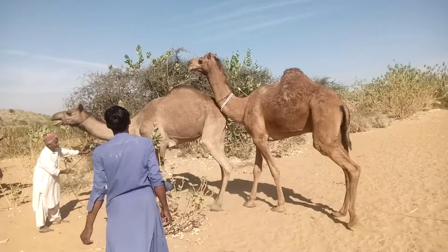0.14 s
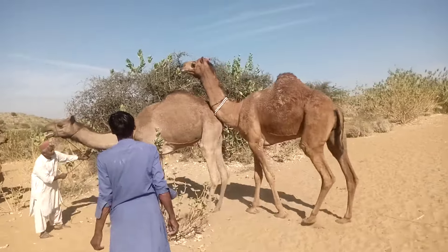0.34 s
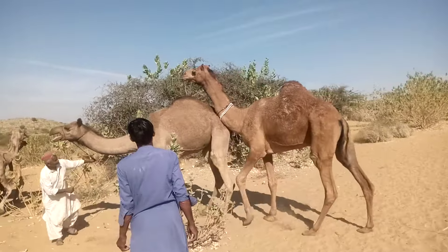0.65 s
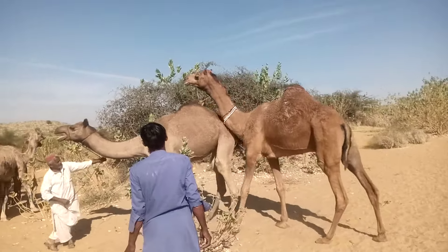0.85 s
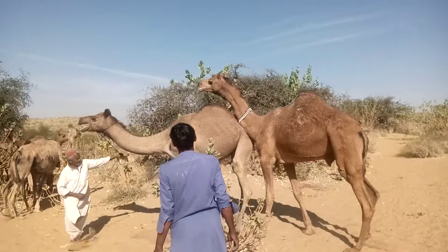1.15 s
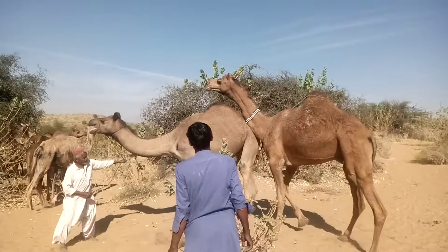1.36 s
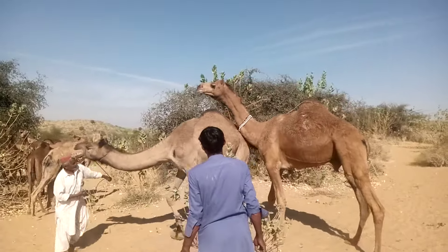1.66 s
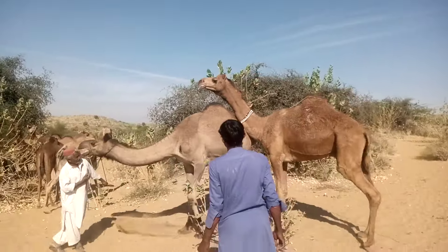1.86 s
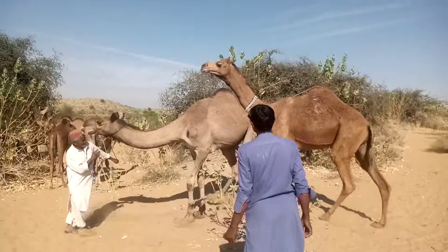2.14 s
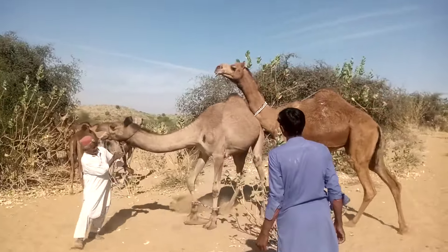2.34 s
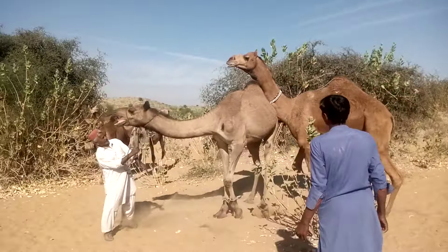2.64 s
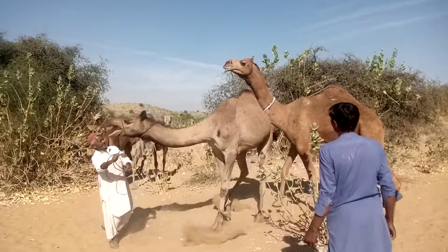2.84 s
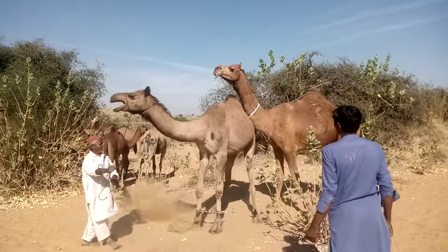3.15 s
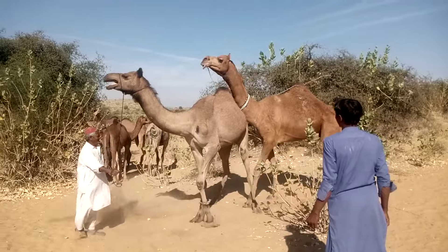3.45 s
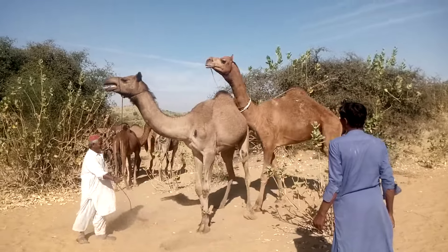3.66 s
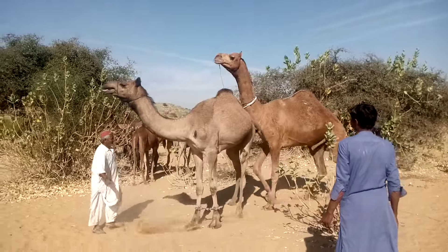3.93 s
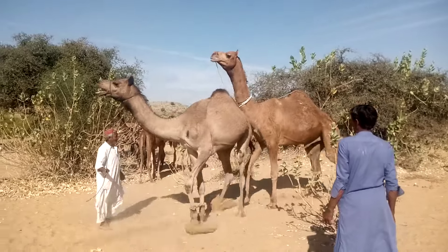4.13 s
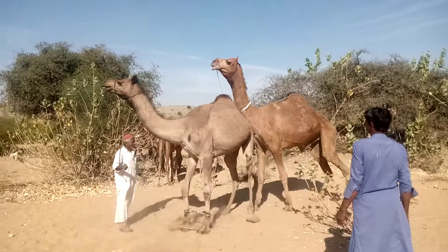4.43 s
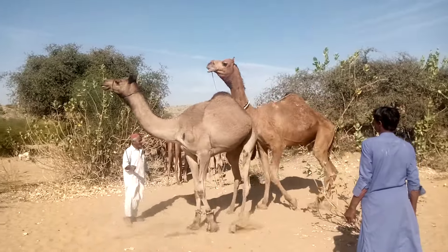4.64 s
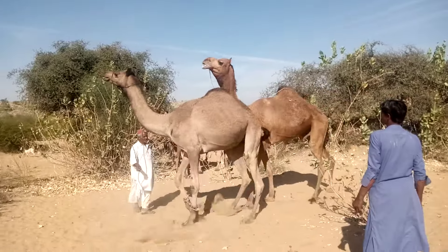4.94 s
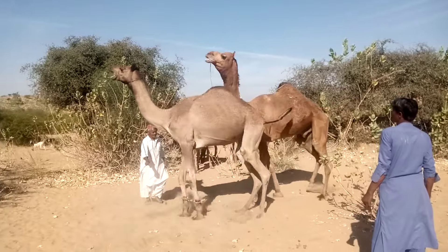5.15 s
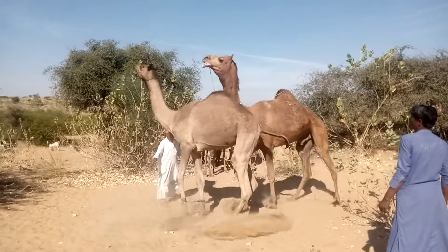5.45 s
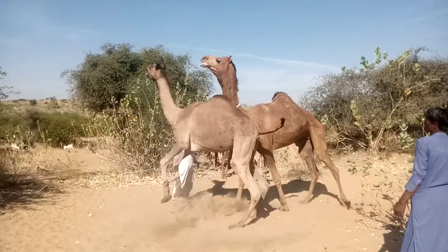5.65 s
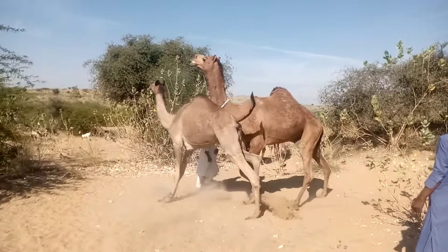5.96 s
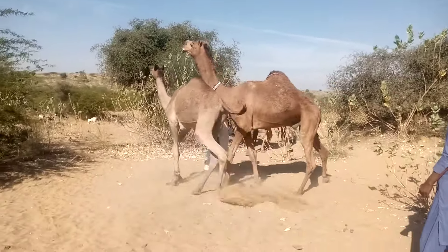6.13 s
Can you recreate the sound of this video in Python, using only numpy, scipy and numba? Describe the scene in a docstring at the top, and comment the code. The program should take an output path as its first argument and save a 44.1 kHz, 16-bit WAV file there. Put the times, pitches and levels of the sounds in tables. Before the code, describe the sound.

A camel bellows three times on open sand, a few metres from a phone microphone. Its calls shift between brief clear notes and a rough, fluttering growl. The first is the longest; after the second come two soft, low groans and a faint rasp, then the last bellow. Underneath, feet thud and scuff in the sand, grit and dry twigs tick, and light wind rumbles on the microphone.

```python
"""On open sand, a camel bellows three times a few metres from a phone, with soft groans before the last.
Its vocal folds sing clear notes that break into a growl when a slack flap in the throat flutters and
chops them; the resonances of throat, mouth and nose filter the pulses. Wind rumbles on the microphone
port; feet thud and scuff the sand, grit and dry twigs tick."""
import sys
import numpy as np
from scipy import signal
from scipy.fft import rfft, irfft
from scipy.io import wavfile
from scipy.ndimage import uniform_filter1d
from numba import njit

SR = 44100
rng = np.random.default_rng(int(sys.argv[2]) if len(sys.argv) > 2 else 0)


def generate_wav(sig):
    """Save sig (samples, or channels by samples) to the path in sys.argv[1] as 16-bit PCM at SR."""
    pcm = np.round(np.clip(np.atleast_2d(sig).T, -1, 1) * 32767).astype(np.int16)
    wavfile.write(sys.argv[1], SR, pcm)


N = 277389
TIME = np.arange(N) / SR


def amp(db):
    """Decibels to amplitude ratio."""
    return 10 ** (np.asarray(db) / 20)


def unit(x):
    """Normalisation to rms 1."""
    return x / np.sqrt(np.mean(x ** 2))


def curves(rows):
    """Linear interpolation of each column over the times in the first."""
    times, *columns = np.transpose(rows)
    return [np.interp(TIME, times, column) for column in columns]


def gate_of(phrases, attack_s, release_s):
    """Trapezoidal envelope, open while any phrase runs."""
    ramps = (np.minimum((TIME - p[0][0]) / attack_s, (p[-1][0] - TIME) / release_s) for p in phrases)
    return np.minimum(sum(np.clip(ramp + 1, 0, 1) for ramp in ramps), 1)


@njit
def bandpass(x, hz, width):
    """Two-pole state-variable resonator with unity gain at its moving centre."""
    y, band, low = np.empty(len(x)), 0., 0.
    for i in range(len(x)):
        g, damping = np.tan(np.pi * hz[i] / SR), width[i] / hz[i]
        v = (band + g * (x[i] - low)) / (1 + g * (g + damping))
        band, low, y[i] = 2 * v - band, low + 2 * g * v, damping * v
    return y


def resonance(x, hz, width, order=2):
    """Resonators in cascade, each `width` Hz wide: every stage steepens the skirts."""
    for _ in range(order):
        x = bandpass(x, hz + np.zeros(N), width + np.zeros(N))
    return x


def noise_band(hz, width, order):
    """Band-limited Gaussian noise of rms 1."""
    return unit(resonance(rng.standard_normal(N), hz, width, order))


def wander(rate):
    """Random modulation of rms 1: `rate` steps a second, smoothed twice."""
    hold = int(SR / rate)
    steps = np.repeat(rng.standard_normal(N // hold + 1), hold)
    return unit(uniform_filter1d(uniform_filter1d(steps, hold), hold)[:N])


def colour(x, points):
    """Spectral shaping by (Hz, dB) points on a logarithmic frequency axis."""
    hz, db = np.transpose(points)
    bins_hz = np.arange(N // 2 + 1) * SR / N
    return irfft(rfft(x) * amp(np.interp(np.log(bins_hz + 1), np.log(hz), db)), N)


def ambience():
    """Noise floor: a faint, broad hush that wavers in level."""
    return amp(-79 + 2.2 * wander(12)) * noise_band(470, 1500, order=2)


# Each row: time in seconds, rumble level in dB.
WIND_LEVELS = [(0.0, -57.5), (.24, -57), (.3, -73), (.38, -54), (1.05, -46.5), (1.33, -46.5), (1.4, -68),
               (1.45, -53), (2.19, -41.5), (2.54, -42), (2.63, -53), (2.79, -42), (2.98, -60.5),
               (3.08, -52), (3.59, -55.5), (3.85, -73.5), (4.06, -46), (4.62, -55), (5.12, -55.5),
               (5.46, -56), (5.85, -82), (5.88, -55), (6.29, -59)]


def wind():
    """Turbulence: eddies buffet the microphone port with a low rumble and brief puffs above it."""
    db, = curves(WIND_LEVELS)
    eddies = rng.standard_normal(N)
    rumble = unit(resonance(eddies, 92, 150, order=3))
    puffs = amp(-28 + 9.5 * wander(23)) * unit(resonance(eddies, 180, 220, order=3))
    return amp(db + wander(22) + 1.1 * wander(6.5)) * (rumble + puffs)


# Shifting sand. Each row: time in seconds, top-octave hiss in dB, lower hiss in dB.
SAND_HISS = [(0.0, -74, -66), (.37, -69, -67), (.91, -75, -81), (1.47, -79.5, -71), (1.63, -70.5, -67.5),
             (1.91, -73, -69.5), (2.2, -75, -72.5), (2.56, -71, -67.5), (2.99, -71.5, -63),
             (3.22, -65, -78), (3.52, -73, -71.5), (3.9, -81, -62.5), (4.1, -76.5, -87.5),
             (4.3, -68, -66.5), (4.6, -73, -77), (4.79, -73, -71), (4.81, -70.5, -62.5),
             (5.25, -73.5, -67.5), (5.83, -70.5, -75), (6.01, -78, -68.5), (6.15, -65, -71),
             (6.29, -73, -93)]
# Spectrum of the hiss. Each row: frequency in Hz, relative spectral density in dB.
GRAIN_SPECTRUM = [(530, -42), (900, -18), (1000, -33), (1370, -15), (1620, -20), (1920, 5), (2710, 1),
                  (3750, 3.5), (5700, 0.5), (8270, -24), (11000, -20), (13700, -34.5), (15800, -23.5)]
# Dragged feet. Each row: start in seconds, length in seconds, level in dB, top octave relative to it in dB.
FOOT_SCUFFS = [(1.606, 0.012, -59, -13), (2.298, 0.029, -63, -10), (2.57, 0.0031, -44.5, -5.5),
               (3.78, 0.015, -58, -21), (3.874, 0.0071, -56.5, -20), (4.2, 0.032, -64.5, -24),
               (4.691, .03, -65.5, -8), (5.581, 0.017, -44, -7), (5.992, 0.049, -46.5, -6.5)]
# Grit and twigs. Each row: start in seconds, snap level in dB, top octave relative to it in dB.
TWIG_TICKS = [(0.4057, -47, -5), (0.6662, -61, 3), (0.754, -48, -48), (0.876, -47.5, -5),
              (0.9085, -47.5, -8), (0.999, -60.5, -1), (1.557, -54, -1), (1.584, -43, -7),
              (1.595, -38.5, -8), (2.5065, -65, 12), (3.119, -57, 7.5), (3.2293, -44.5, -26),
              (3.3138, -55, 4.5), (3.5686, -45.5, -3), (3.7257, -60, 6), (4.259, -56, -7),
              (4.381, -43, -7.5), (4.454, -43, -15), (4.6014, -68.5, 7), (4.987, -51.5, -1),
              (5.037, -49, -12), (5.3135, -46, -37), (5.5468, -56.5, -3), (5.893, -44.5, -10),
              (6.1772, -47.5, -10)]
SNAP_T60_S, TRICKLE_T60_S, TRICKLE_DB = 0.0066, 0.055, -4.5


def sand():
    """Granular friction and impact: grains hiss, feet scuff, and a trickle follows each snap."""
    top_db, lower_db = curves(SAND_HISS)
    grain_db = 2.1 * np.minimum(rng.exponential(size=N // 60 + 1), 4.5)
    grains = unit(amp(grain_db).repeat(60)[:N])
    top_gain = amp(top_db + 1.6 * wander(13)) * grains
    lower_gain = amp(lower_db + 4 * wander(18)) * grains
    crackle_gain = np.zeros(N)
    for start, length, db, bright_db in FOOT_SCUFFS:
        release = np.exp(-np.maximum(TIME - start - length, 0) / 0.011)
        drag = amp(db) * grains * np.clip((TIME - start) / 0.006, 0, 1) * release
        crackle_gain += drag
        top_gain += drag * amp(bright_db)
    for start, db, bright_db in TWIG_TICKS:
        age = np.maximum(TIME - start, 0)
        decay = amp(-60 * age / SNAP_T60_S) + amp(TRICKLE_DB - 60 * age / TRICKLE_T60_S)
        snap = amp(db) * np.minimum(age / 0.00023, 1) * decay
        crackle_gain += snap
        top_gain += snap * amp(bright_db)
    hiss = colour(rng.standard_normal(N), GRAIN_SPECTRUM)
    lower = signal.sosfilt(signal.butter(4, 7600, fs=SR, output="sos"), hiss)
    top = signal.sosfilt(signal.butter(4, 7600, "high", fs=SR, output="sos"), hiss)
    # each band of the lower hiss comes and goes on its own
    patches = sum(amp(2.5 * wander(12)) * resonance(lower, hz, hz / 2) for hz in 1000 * 1.4 ** np.arange(7))
    crackle = noise_band(4630, 3600, order=3)
    return lower_gain * unit(patches) + crackle_gain * crackle + top_gain * unit(top)


# Each row: time of the peak in seconds, peak level in dB, reach in Hz (twice the centre of the band).
FOOTFALLS = [(2.138, -48.5, 430), (2.251, -49.5, 504), (2.55, -46.5, 394), (4.03, -53, 454),
             (4.22, -45.5, 300.6), (4.85, -52.5, 706), (4.898, -52, 799), (5.09, -47.5, 902)]


def footfalls():
    """Damped impact: a padded foot on sand gives a short, dull burst of noise."""
    noise, out = rng.standard_normal(N), 0
    for peak_s, db, reach_hz in FOOTFALLS:
        thud = unit(resonance(noise, reach_hz / 2, 0.98 * reach_hz, order=4))
        out += amp(db) * thud * np.exp(-((TIME - peak_s) / 0.015) ** 2)
    return out


def harmonics(hz, levels_db, lag_rad=0.9):
    """Harmonic series from rms levels; a quadratic phase lag smears each pulse, as the throat does."""
    phase = 2 * np.pi * np.cumsum(hz) / SR
    return sum(np.sqrt(2) * amp(db) * np.cos((k + 1) * phase - lag_rad * k ** 2)
               for k, db in enumerate(levels_db))


# One list per groan. Each row: time in seconds, pitch in Hz, level of the strongest harmonic in dB,
# its number, slope to either side in dB per harmonic.
SOFT_GROANS = [
    [(3.7, 146, -62, 1, -20), (3.8, 143, -62, 1, -20), (3.92, 132, -68, 1, -20)],
    [(4.27, 57, -71, 6, -3), (4.35, 55, -67, 6, -3), (4.5, 49, -67, 7, -3), (4.62, 45, -73, 7, -3)],
]


def groans():
    """Phonation with the mouth shut: a soft hum with one spectral peak."""
    hz, db, strongest, slope_db = curves(np.concatenate(SOFT_GROANS))
    levels_db = [db + abs(k - strongest) * slope_db + 0.94 * wander(4.37) for k in range(1, 13)]
    return gate_of(SOFT_GROANS, 0.034, 0.034) * harmonics(hz, levels_db)


# Each row: start in seconds, length in seconds, tremble as a fraction of the pitch, then harmonics 1 to 7
# in dB relative to the call level, before bloom.
CLEAR_NOTES = [(0.165, 0.155, 0.0048, 3, -14.5, -11, -5, -10, -21, -24),
               (1.279, 0.11, .003, 0, -6, -18.5, -25, -13.5, -24.5, -26),
               (1.722, 0.065, .016, -7.5, -4.5, -15, -27, -25.5, -39, -36),
               (2.661, 0.092, .012, 2.5, -6, -5.5, -45, -22.5, -29, -33.5),
               (2.775, 0.14, 0.0048, 0.5, 0, -5, -15.5, -22, -39.5, -38.5)]
BLOOM, BLOOM_FROM_DB = 0.25, -19  # louder is brighter: dB per harmonic per dB of level, and its pivot


def clear_notes(hz, db):
    """Periodic vibration of the folds gives a harmonic tone; returns the tone and its gate."""
    spans = [[(start, *rest), (start + length, *rest)] for start, length, *rest in CLEAR_NOTES]
    tremble, *spectrum_db = curves(np.concatenate(spans))
    gate = gate_of(spans, attack_s=0.0089, release_s=0.057)
    pitch = hz * (1 + tremble * wander(60))
    tilt_db = BLOOM * (db - BLOOM_FROM_DB)
    levels_db = [level + k * tilt_db + (.5 + k) * wander(50) for k, level in enumerate(spectrum_db)]
    return gate * amp(db) * harmonics(pitch, levels_db), gate


@njit
def pulse_train(hz, speed, size):
    """Jitter and shimmer: each cycle has its own speed and size. Returns pulses and phase from 0 to 1."""
    pulses, phases, phase, cycle = np.zeros(len(hz) + 1), np.empty(len(hz)), 0., 0
    for i in range(len(hz)):
        step = hz[i] * speed[cycle] / SR
        phase += step
        if phase >= 1:
            phase, cycle = phase - 1, cycle + 1
            pulses[i] += size[cycle] * phase / step
            pulses[i + 1] += size[cycle] * (1 - phase / step)
        phases[i] = phase
    return pulses[:-1], phases


# Each row holds until the next: start in seconds, flutter rate in Hz, depth and unevenness from 0 to 1.
FLAP_FLUTTER = [(0, 33, 0.6, .17), (.15, 28, 0.9, .08), (.54, 32.5, .95, .015), (.82, 40, .9, .1),
                (1.09, 45, 0.92, .2), (1.7, 60, .8, .18), (2.63, 85, 0.55, .25), (3.28, 24, .9, .3),
                (4.79, 25, 0.8, 0.6), (5.27, 55, .92, .3), (5.58, 48, .95, .08), (5.78, 32, .97, 0.4)]
FOLD_JITTER, FOLD_SHIMMER_DB, SLIP_CYCLES = .06, 3, .4


def chopped_folds(hz, calm):
    """Amplitude modulation: the flap chokes the fold pulses and slaps. Returns low, high and nasal drive."""
    rows = np.array(FLAP_FLUTTER)
    rate, depth, uneven = rows[np.searchsorted(rows[1:, 0], TIME), 1:].T
    jitter, shimmer, flap_jitter, flap_shimmer = rng.standard_normal((N // 60, 4)).T
    flap_hz = rate * np.exp(uneven * wander(30))
    slaps, flap_phase = pulse_train(flap_hz, np.exp(.06 * flap_jitter), amp(3.5 * flap_shimmer))
    slip_hz = SR * np.minimum(SLIP_CYCLES * depth * slaps, .9)  # each slap jolts the folds' phase
    folds, _ = pulse_train(hz + slip_hz, np.exp(FOLD_JITTER * jitter), amp(FOLD_SHIMMER_DB * shimmer))
    opening = 1 - depth * np.cos(np.pi * flap_phase) ** 4
    breath = rng.standard_normal(N) * opening
    voiced = unit(folds * opening - np.mean(folds * opening))
    spurt = 1 + 5 * depth * (1 - calm) * np.exp(-flap_phase / 0.088)  # air escapes after each slap
    low = voiced + .35 * breath + 0.63 * unit(slaps)
    high = voiced + 3.1 * breath * spurt + unit(slaps)
    rattle = 1.6 * depth ** 4 * (1 - calm) * unit(slaps)  # full closure rattles the nose
    return low, high, high + rattle


def formant_cluster(drive, modes, shift=1):
    """Parallel resonances, each drifting in frequency and flickering in level; rms 1."""
    return unit(sum(amp(db + 3 * wander(14)) * resonance(drive, hz * shift * (1 + .025 * wander(7.3)), width)
                    for hz, width, db in modes))


def antiresonance(x, hz, width, depth):
    """A side branch absorbs one band of the spectrum."""
    return x - depth * resonance(x, hz, width, order=1)


# Rasp and, above it, air resonances. Each row: frequency in Hz, width in Hz, relative level in dB.
RASP_MODES = [(1910, 300, -8), (2300, 400, -10.5), (2880, 350, -12)]
AIR_MODES = [(3250, 400, 5.5), (4104, 450, 7), (4460, 220, 6)]
# Each row: time in seconds, mouth gain in dB before opening is added, nose resonance in Hz, nose gain
# in dB before strain is added, side-pocket dip in Hz, air relative to rasp in dB.
UPPER_TRACT = [(0, -0.5, 1410, -4, 2940, -6), (.24, 7, 1415, 11.5, 3160, 1.5),
               (.42, 0, 1470, -9, 3080, -1.5), (.72, -1.5, 1511, 2, 2810, -1.5),
               (1.05, -6, 1590, -14, 2710, -1), (1.18, -7.5, 1630, -4.5, 2752, 2),
               (1.4, -14, 1588, 0, 2680, 7.5), (1.62, -6, 1480, -5.5, 3130, -1),
               (1.94, -11, 1674, -5, 3025, -1), (2.64, -10.5, 1747, -9, 3740, -10),
               (2.79, 1, 1618, -10.5, 3610, -3.5), (2.92, -4, 1440, 6.5, 3510, 2),
               (3.1, -4, 1323, 5.5, 2938, -5), (3.27, -4, 1491, 2, 2880, -7),
               (3.55, -8.5, 1520, -12.5, 2810, -10.5), (3.76, 10.5, 1613, -5, 2850, -13),
               (4.8, -2, 1380, 3.5, 3136, 7), (5.26, -16, 1380, -5.5, 3030, 0),
               (5.3, -14, 1268, -3.5, 3070, -20), (5.5, -14.5, 1200, -11, 2780, -10.5),
               (5.68, -30, 1197, -12.5, 2735, -6), (5.74, -0.5, 1750, -17.5, 2710, -6),
               (6.0, -8, 1747, -18, 2845, -14), (6.29, -32, 1694, -10.5, 3170, -1)]
# Two resonances between palate and teeth. Each row: time in seconds, edge resonance in Hz, its level over
# the rasp in dB, top resonance in Hz, its level over the rasp in dB, side-pocket depth from 0 to 1.
PALATE_MODES = [(0, 5240, -4, 6200, 6, .9), (.17, 5400, -6.5, 6300, -29, 0), (.3, 5000, -2, 6200, -30, 0.8),
                (.45, 5150, -9, 6070, -5, 0.99), (.75, 4950, -7.5, 5950, -30, 0.45),
                (1.05, 5300, -10.5, 6130, -1.5, 0.98), (1.42, 5100, -11, 6100, -12.5, 0.85),
                (1.68, 5650, -11.5, 6400, -22.5, 0.99), (1.74, 5500, -11, 6335, -26, 0.02),
                (1.8, 4590, -18, 6360, -19, 0.05), (1.94, 4940, -9, 6040, -12, 0.6),
                (2.68, 5200, -13.5, 6178, -21, 0.71), (2.76, 4900, -16.5, 6180, -11.5, 0.54),
                (2.86, 5160, -2.5, 6320, -13.5, 0.72), (3.1, 5580, -15, 6490, -17, 0.97),
                (3.3, 4860, -16, 6160, -18.5, 0.86), (3.76, 5020, -17, 6070, -33.5, 1),
                (4.8, 5100, -7.5, 5880, -12, 0), (5.3, 4900, -17, 6170, -24, 0.18),
                (5.45, 4860, -21, 6090, -23, 0.3), (5.55, 4800, -12, 6040, -17, 0.9),
                (6.29, 4990, -18, 6000, -26, 0.58)]
# Dip of the nasal passage. Each row: time in seconds, frequency in Hz, depth from 0 to 1.
NASAL_NOTCH = [(1.9, 1301, 0.31), (3.2, 1314, 0.25), (3.35, 1275, 0.86), (3.6, 1268, 0.79), (5.3, 1559, .3),
               (5.6, 1424, 0.4), (5.95, 1490, 0.8), (6.1, 1606, .5), (6.25, 1180, 0.4)]


def growl(clear_gate, hz, db, opening_db, strain_db, throat_hz, mouth_hz):
    """Source and filter: the chopped pulses excite the formants of the vocal tract."""
    mouth_db, nose_hz, nose_db, pocket_hz, air_db = curves(UPPER_TRACT)
    edge_hz, edge_db, top_hz, top_db, pocket_depth = curves(PALATE_MODES)
    notch_hz, notch_depth = curves(NASAL_NOTCH)
    calm = uniform_filter1d(clear_gate, 2600)  # roughness recedes during a clear note
    low, high, nasal = chopped_folds(hz, calm)
    chest = unit(resonance(low, 1.067 * hz, 310, order=4))
    throat = amp(opening_db) * unit(resonance(low, throat_hz, 290, order=4))
    mouth = amp(mouth_db + 0.98 * opening_db) * unit(resonance(high, mouth_hz, 300, order=4))
    nose = amp(nose_db + 0.42 * strain_db) * unit(resonance(nasal, nose_hz, 380, order=4))
    out = amp(-17 * calm) * chest + amp(-12 * calm) * (throat + mouth) + amp(-4.3 * calm) * nose
    out += amp(strain_db) * formant_cluster(high, RASP_MODES)
    out += amp(strain_db + air_db) * formant_cluster(high, AIR_MODES, shift=(pocket_hz / 2943) ** 0.09)
    for mode_hz, mode_db in ((edge_hz, edge_db), (top_hz, top_db)):
        out += amp(strain_db + mode_db + 3 * wander(17)) * unit(resonance(high, mode_hz, 400, order=3))
    for _ in range(2):  # the side pocket of the throat
        out = antiresonance(out, pocket_hz, 800, pocket_depth)
    return amp(db) * antiresonance(out, notch_hz, 240, notch_depth)


# One list per push of breath. Each row: time in seconds, pitch in Hz, call level in dB, mouth opening as
# throat gain in dB, strain as rasp gain in dB, throat resonance in Hz, mouth resonance in Hz.
BELLOWS = [
    [(0.0, 340.5, -49.5, -22, -48, 720, 1078), (.038, 337, -55, -8, -7, 720, 1112),
     (.07, 345.3, -90, 5, -11, 760, 1100), (.1, 333, -64, -4.5, -2, 694, 1038),
     (.15, 317.7, -53.5, -35, -38, 680, 1000)],
    [(.158, 323, -35.5, -19, -21, 668, 970), (.241, 337.8, -30, -12.5, -30.5, 633, 940),
     (.34, 297.4, -35, -8, -23, 622, 929), (.415, 316.6, -40, -9, -18.5, 605, 883),
     (.631, 333, -34, -16, -31.5, 648, 850), (.805, 343.6, -31.5, -6.5, -21.5, 720, 880),
     (.903, 345.1, -31, -4.5, -31, 675, 908), (1.041, 313.6, -43, -10, -22.5, 700, 1102),
     (1.09, 306.6, -35, -23, -47, 724, 1070)],
    [(1.1, 314, -36.5, -13.5, -45, 731, 1008), (1.162, 309, -35, -6, -34.5, 730, 1078),
     (1.27, 298.7, -32, -1.5, -33, 742, 1073), (1.336, 316.3, -30, -2, -36, 761, 997),
     (1.415, 326.6, -25.5, 5, -34.5, 772, 958), (1.572, 322, -42, -7, -35, 795, 985),
     (1.7, 329.7, -33, -9, -28, 720, 973)],
    [(1.712, 322.7, -29.5, -4, -31, 679, 975), (1.755, 326.6, -26, -8, -21, 656, 941),
     (1.8, 317.9, -27, 5, -19.5, 594, 956), (1.854, 330.3, -34.5, -7, -31, 581, 906),
     (1.94, 340.4, -72, 4, 4, 551, 957)],
    [(2.65, 233.6, -44, 2.5, -18, 750, 1057), (2.692, 314.6, -29.5, 10, -14, 740, 1068),
     (2.818, 362.8, -21, 0.5, -27.5, 751, 1037), (2.93, 375.4, -24, -1.5, -24, 739, 1001),
     (3.0, 359, -30, 1, -18, 609.5, 971), (3.27, 330.9, -31, -4.5, -17, 659, 1033),
     (3.29, 324.1, -34, -6.5, -18, 672, 1065), (3.528, 282.3, -33.5, -9.5, -22.5, 806, 1060),
     (3.576, 274.4, -34.5, -21, -30, 810, 1090), (3.648, 247, -46.5, -7, -21, 864, 1170),
     (3.76, 210, -78, 1, 3, 843, 1104)],
    [(4.803, 315.6, -61.5, -1, -6, 610, 848), (4.83, 311.3, -59, -3, -4.5, 610, 850),
     (5.05, 319.3, -64.5, -1.5, -5.5, 680, 890), (5.26, 317.4, -63.5, 7, -1.5, 750, 942)],
    [(5.285, 347, -33, 1, -18.5, 630, 1000), (5.346, 336, -34, -0.5, -11, 615, 968),
     (5.568, 314, -31.5, 2, -19.5, 610, 900), (5.7, 305.9, -32, -5, -23, 595, 820),
     (5.84, 360.8, -29, -9, -25, 703, 1010), (5.98, 363, -30, -10.5, -23.5, 767, 1094),
     (6.08, 317.4, -29, -3.5, -22.5, 792.3, 1360), (6.29, 288.2, -36, -3, -24.5, 744, 1004)],
]


def bellows():
    """Two regimes of phonation, periodic and rough, share one contour of pitch and level."""
    hz, db, *tract = curves(np.concatenate(BELLOWS))
    clear, clear_gate = clear_notes(hz, db)
    return clear + gate_of(BELLOWS, 0.01, 0.01) * growl(clear_gate, hz, db, *tract)


def scene():
    """Superposition over open ground: the voice has a single reflection, off the sand."""
    camel = bellows() + groans()
    reflection = amp(-21) * np.roll(camel, 170)  # 3.9 ms late
    return (ambience() + wind() + footfalls() + sand() + camel + reflection)[None]


def record(dry):
    """Band limiting: the phone drops the deepest bass, its port resonates, and the top is cut off."""
    x = signal.sosfilt(signal.butter(2, 45, "high", fs=SR, output="sos"), dry)
    x = x + 1.5 * resonance(x[0], 15200, 1500, order=1)
    return signal.sosfilt(signal.ellip(10, .2, 80, 15850, fs=SR, output="sos"), x)


dry = scene()
out = record(dry)
generate_wav(out)
```